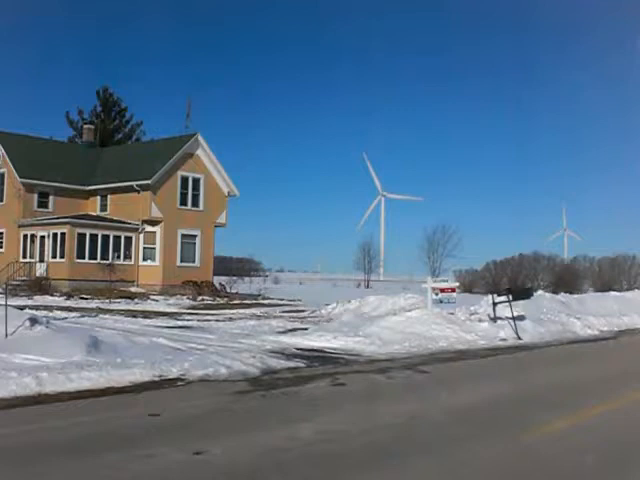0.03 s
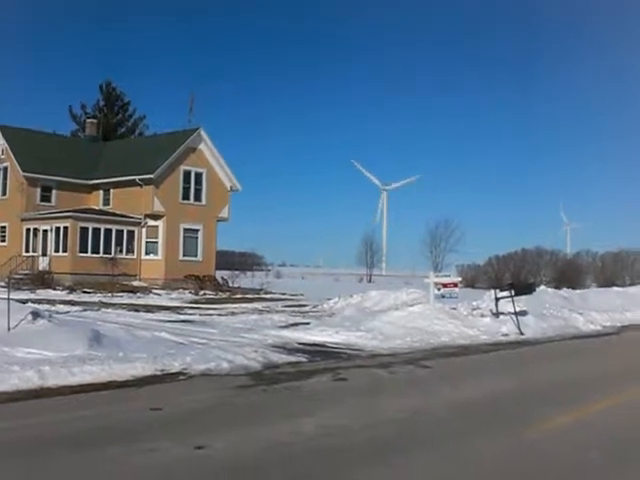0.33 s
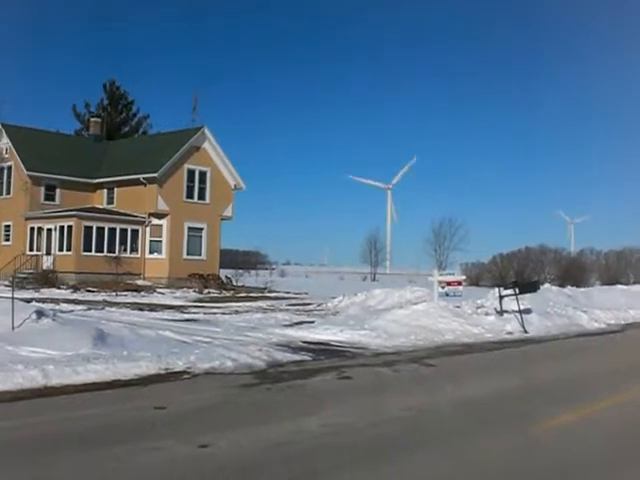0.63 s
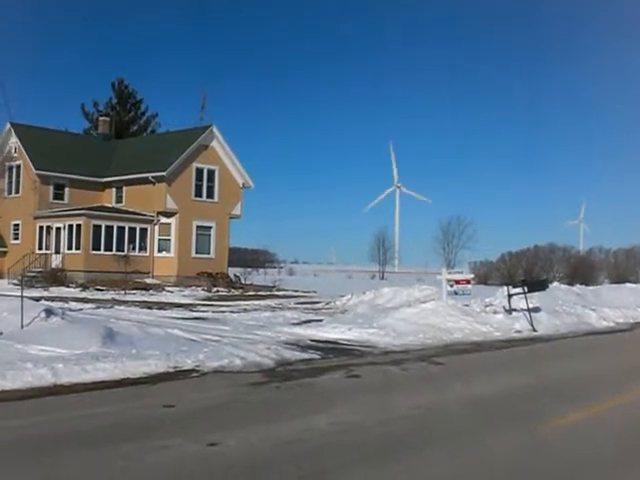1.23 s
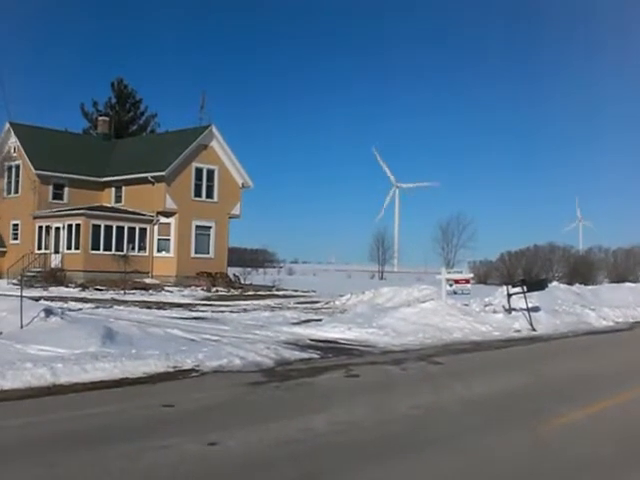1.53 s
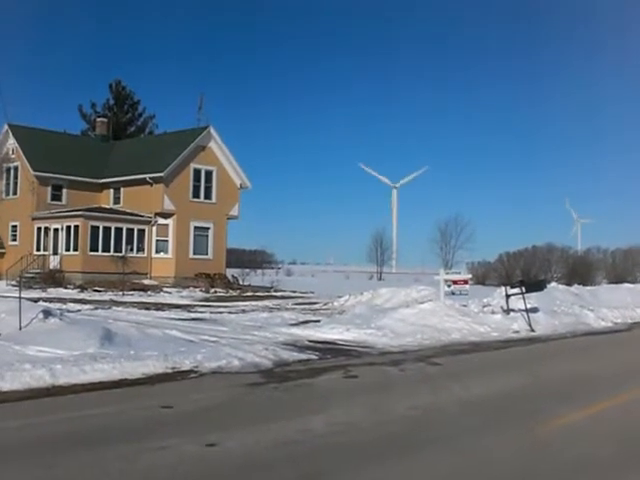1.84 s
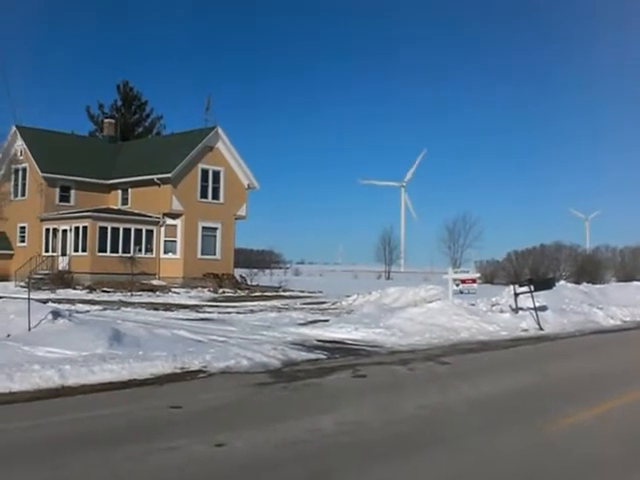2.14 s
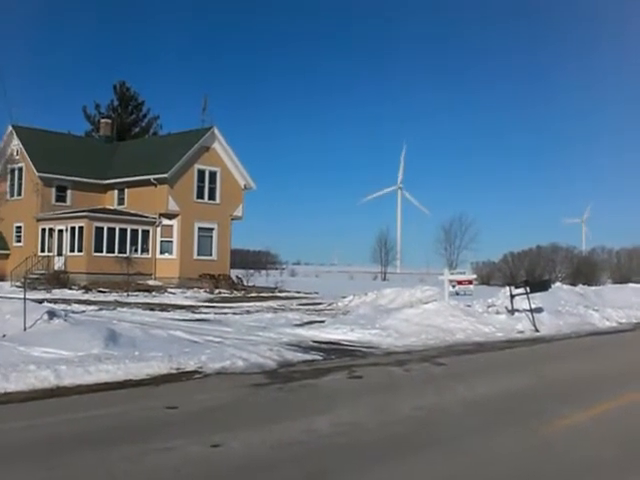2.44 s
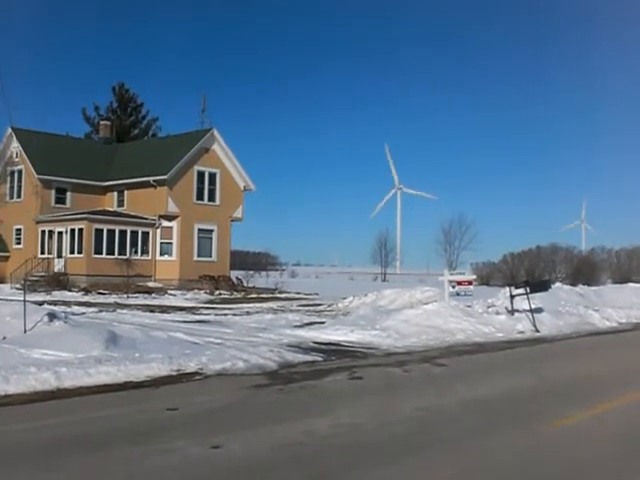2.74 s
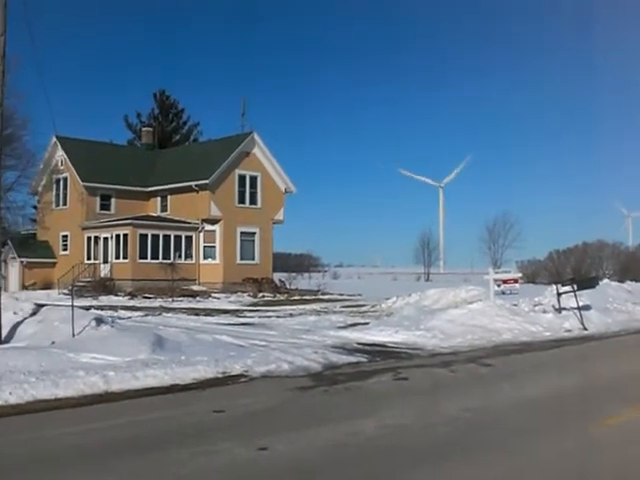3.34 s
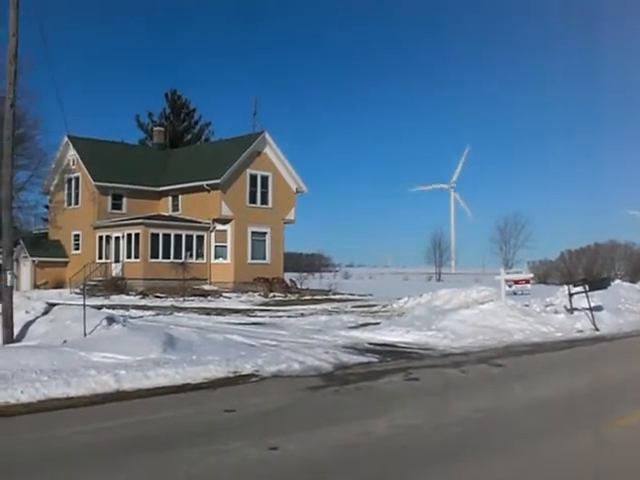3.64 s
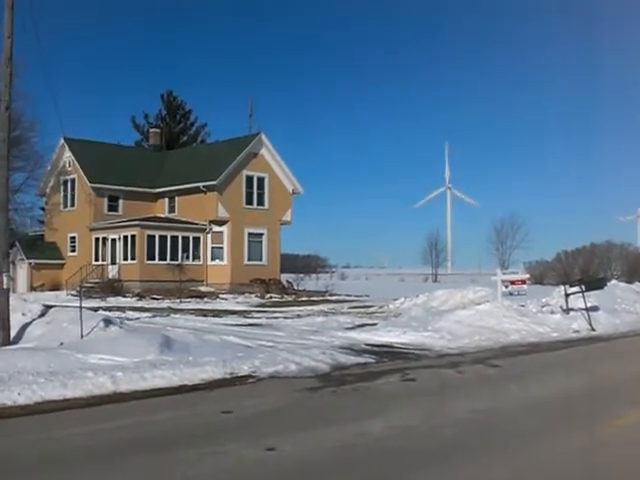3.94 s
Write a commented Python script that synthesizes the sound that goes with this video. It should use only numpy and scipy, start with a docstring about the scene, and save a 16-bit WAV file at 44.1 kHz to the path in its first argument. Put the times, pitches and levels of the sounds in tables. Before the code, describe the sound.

A nearby idling car engine hums and throbs while a light gust rumbles past.

```python
"""An engine, probably a parked car, idling close by at a roadside in open, snowy country.
Crank harmonics give a throbbing low hum; rush and hiss pulse with the firing.
Over them: a fan tone, faint whines and squeaks, and a thin whistle that comes and goes.
A few small high ticks follow the abrupt start; midway a light gust buffets the microphone."""
import sys
import numpy as np
from scipy import signal
from scipy.fft import rfft, irfft
from scipy.io import wavfile

SR = 44100
rng = np.random.default_rng(int(sys.argv[2]) if len(sys.argv) > 2 else 0)


def wav_record(signal):
    """Record a signal, one row per channel, as 16-bit PCM in the file named by sys.argv[1]."""
    frames = np.transpose(np.atleast_2d(signal))
    bounded = np.clip(frames, -1, 1)
    # unit amplitude maps onto the largest positive 16-bit level
    quanta = np.round(bounded * 32767).astype(np.int16)
    wavfile.write(sys.argv[1], SR, quanta)


N = 176400
TIME = np.arange(N) / SR
FREQS = np.maximum(np.arange(N // 2 + 1) * SR / N, 1)


def from_db(db):
    """Decibels to gain."""
    return 10 ** (np.asarray(db) / 20)


def unit_rms(x):
    """Scale to unit rms."""
    return x / np.sqrt(np.mean(x ** 2) + 1e-20)


def curve(rows):
    """Per-sample curve through (t/s, value) rows."""
    return np.interp(TIME, *np.transpose(rows))


def noise(gain):
    """Unit-rms noise shaped by a gain per frequency."""
    return unit_rms(irfft(rfft(rng.standard_normal(N)) * gain, N))


def coloured_noise(spectrum):
    """Unit-rms noise shaped by (f/Hz, relative level/dB) rows."""
    hz, db = np.transpose(spectrum)
    return noise(from_db(np.interp(np.log(FREQS), np.log(hz), db)))


def band_noise(hz, width_oct):
    """Unit-rms noise in a band, Gaussian in log frequency."""
    return noise(np.exp(-.5 * (np.log2(FREQS / hz) / width_oct) ** 2))


def ringing(hz, width_hz):
    """Unit-rms noise in a narrow resonance."""
    return noise(1 / (1 + 2 * ((FREQS - hz) / width_hz) ** 2))


def drift(rate_hz):
    """Unit-rms random wander, mostly below rate_hz."""
    return noise(1 / (1 + (FREQS / rate_hz) ** 2))


def engine_hum(turns):
    """Wavering crank harmonics; the low ones align once per turn and throb."""
    # crank harmonics: order, level/dB
    orders = [(2, -65), (5, -42), (6, -47.5), (7, -52), (8, -55), (10, -63), (11, -57), (12, -61.5),
              (13, -65.5), (14, -63.5), (15, -57.5), (16, -78), (17, -75), (18, -63), (27, -70)]
    throb_at_turns, max_aligned_order = .61, 6
    out, shared_phase = 0, rng.random()
    for order, db in orders:
        waver_db = np.interp(order, [6, 12], [1.85, 1.5])
        phase = order * (turns - throb_at_turns) + shared_phase
        phase += rng.random() * (order > max_aligned_order)
        out += from_db(db + waver_db * drift(3.7)) * np.sin(2 * np.pi * phase)
    return np.sqrt(2) * out


def fan():
    """Steady low tone, probably the cooling fan."""
    hz, db = 54.8, -52.5
    return np.sqrt(2) * from_db(db) * np.sin(2 * np.pi * (hz * TIME + rng.random()))


def whines():
    """Unsteady narrow whines, probably of belt and fan."""
    # resonances: f/Hz, width/Hz, level/dB
    resonances = [(603.5, 6, -79), (865, 45, -70), (991, 33, -66), (1109, 44, -67.5), (1177, 25, -70.5),
                  (1267, 24, -68.5), (1496, 9.6, -76), (2054, 51, -73), (2600, 22, -72.5), (2570, 11, -82),
                  (5630, 83, -83)]
    return sum(from_db(db) * ringing(hz, width_hz) for hz, width_hz, db in resonances)


def squeaks(turns):
    """Faint uneven chirps in step with the crank, probably of belt and valves."""
    # chirps: f/Hz, width/Hz, repeats per turn, offset/turns, level/dB
    chirps = [(4153, 40, 2 / 3, 1.07, -77), (3980, 31, 2 / 3, 1.05, -78.5), (2973, 23, 2, .1, -74.5)]
    sharpness, uneven_db = 2, .5
    out = 0
    for hz, width_hz, repeats, offset, db in chirps:
        gate = np.exp(sharpness * np.cos(2 * np.pi * repeats * (turns - offset)))
        strength = from_db(uneven_db * drift(12))
        out += from_db(db) * unit_rms(gate * strength * ringing(hz, width_hz))
    return out


def engine_noise(turns):
    """Fluttering rush and hiss plus an airy band; all pulse at each firing, twice per turn."""
    # engine and air rush spectrum: f/Hz, relative level/dB
    rush_spectrum = [(25, -41), (43, -28), (58, -4), (100, -8.5), (140, -3.5), (190, -5), (240, -1.5),
                     (300, -7.5), (400, -8), (520, -11.5), (800, -13), (1200, -19.5), (1400, -29.5),
                     (2000, -30.5), (4000, -59)]
    # engine hiss spectrum: f/Hz, relative level/dB
    hiss_spectrum = [(700, -18.5), (1400, -3), (1800, -6), (2100, -4), (2600, -1.6), (3200, -4.5),
                     (4000, -8.5), (5000, -12), (6300, -14.5), (8500, -17.5), (12000, -20)]
    # airy band, weaker midway: t/s, level/dB
    airy_levels = [(.3, -66.5), (.85, -65.5), (1.3, -74), (3.5, -70.5), (3.95, -62)]
    rush_db, rush_flutter_db, rush_throb = -49, 1.0, .13
    hiss_db, hiss_flutter_db, hiss_throb = -57, .64, .092
    firing = np.cos(2 * np.pi * 2 * (turns - .08))
    rush = from_db(rush_db + rush_flutter_db * drift(14)) * coloured_noise(rush_spectrum)
    hiss = from_db(hiss_db + hiss_flutter_db * drift(14)) * coloured_noise(hiss_spectrum)
    airy = from_db(curve(airy_levels)) * ringing(hz=2450, width_hz=260)
    return (1 + rush_throb * firing) * rush + (1 + hiss_throb * firing) * (hiss + airy)


def ticks():
    """Brief high ticks and rubs, perhaps of a hand near the microphone."""
    # noise puffs: t/s, length/s, f/Hz, width/octaves, level/dB (rms over the length)
    puffs = [(0.247, 0.0083, 8500, 0.25, -62.5), (0.32, .03, 8350, .07, -63),
             (0.327, 0.061, 8260, 0.32, -65), (0.534, 0.006, 9500, 0.1, -50.5),
             (0.533, 0.0072, 7000, 0.81, -52.5), (0.535, 0.0057, 3820, 0.22, -56),
             (0.577, 0.015, 4180, 0.021, -59.5)]
    out = 0
    for at_s, length_s, hz, width_oct, db in puffs:
        puff = band_noise(hz, width_oct) * np.exp(-2 * ((TIME - at_s) / length_s) ** 2)
        out += from_db(db) * unit_rms(puff) * np.sqrt(length_s * SR / N)
    return out


def whistle():
    """Thin, slightly wandering tone that comes and goes."""
    # whistle envelope: t/s, level/dB
    levels = [(.7, -90), (1.05, -72), (1.3, -83), (1.75, -75), (3.4, -72), (3.55, -84)]
    pitch_hz = 3754 + 3.01 * drift(8.2)
    return np.sqrt(2) * from_db(curve(levels)) * np.sin(2 * np.pi * np.cumsum(pitch_hz) / SR)


def wind():
    """Lumpy gust rumble plus eddy thumps; the microphone drops the deepest bass."""
    # gust envelope: t/s, level/dB
    gust = [(.3, -70), (1.0, -51), (1.35, -42), (1.58, -49), (1.75, -48), (1.95, -48), (2.3, -47.5),
            (2.6, -44), (3.0, -49), (3.3, -58), (4.0, -52)]
    # rumble spectrum: f/Hz, relative level/dB
    rumble_spectrum = [(30, -38), (43, -29), (58, 1), (120, -4.5), (180, -9), (260, -13.5), (400, -23.5),
                       (800, -48)]
    lump_db, low_cut_hz = 1.5, 48
    rumble = from_db(curve(gust) + lump_db * drift(51)) * coloured_noise(rumble_spectrum)
    low_cut = signal.butter(4, low_cut_hz, "high", fs=SR, output="sos")
    return signal.sosfiltfilt(low_cut, rumble + buffets())


def buffets():
    """Eddies hit the microphone: a brighter front edge, then a pressure swing that wobbles and slows."""
    # eddies: t/s, length/s, f/Hz, level/dB
    eddies = [(1.141, 0.0088, 108, -33.5), (1.314, 0.014, 93, -32), (1.337, 0.0086, 179, -33),
              (1.359, 0.011, 174.2, -25), (1.422, .009, 121.5, -32.5), (1.45, 0.018, 74, -31.5),
              (1.473, 0.014, 190, -37), (1.647, 0.024, 101.2, -36.5), (1.697, 0.015, 72.5, -30.5),
              (1.72, 0.011, 119.4, -29), (1.768, 0.011, 151, -34), (1.796, 0.021, 138, -28.5),
              (1.896, 0.007, 160, -40.5), (2.013, 0.015, 100.2, -34.5), (2.073, 0.02, 165.7, -38),
              (2.181, .018, 78, -34), (2.247, 0.0065, 159, -34), (2.276, 0.02, 69, -31.5),
              (2.292, 0.0064, 190, -35.5), (2.303, 0.0057, 175, -31.5), (2.352, 0.033, 136, -34),
              (2.439, 0.0073, 156, -33.5), (2.461, 0.0072, 205, -27.5), (2.48, 0.011, 121, -28.5),
              (2.589, 0.0058, 140.4, -36), (2.723, 0.0078, 163.1, -30), (2.748, .015, 83, -25.5),
              (2.911, 0.014, 78, -34), (2.987, 0.011, 97, -34), (3.03, .01, 126, -41),
              (3.078, 0.017, 101.4, -25.5)]
    sag_oct_per_length, edge_lead_s = .15, .0033
    wander_oct = .2 * drift(71.8)
    edge_noise = from_db(-12) * band_noise(hz=238, width_oct=.43)
    out = np.zeros(N)
    for at_s, length_s, hz, db in eddies:
        near = abs(TIME - at_s) < 3 * length_s
        age = (TIME[near] - at_s) / length_s
        pitch_hz = hz * 2 ** (wander_oct[near] - sag_oct_per_length * age)
        phase = np.cumsum(pitch_hz) / SR + rng.random()
        swing = np.sqrt(2) * np.sin(2 * np.pi * phase) * np.exp(-2 * age ** 2)
        edge = edge_noise[near] * np.exp(-8 * (age + edge_lead_s / length_s) ** 2)
        out[near] += from_db(db) * (swing + edge)
    return out


def scene():
    """Engine, ticks and wind at one microphone."""
    # idle speed: t/s, crank rate/Hz
    speed = [(.3, 14.8), (.9, 14.81), (1.2, 14.91), (1.7, 14.92), (1.87, 15.08), (2.15, 14.85),
             (2.45, 14.82), (2.8, 14.91), (3.45, 14.88), (3.75, 15.04), (4.0, 14.94)]
    turns = np.cumsum(curve(speed)) / SR
    engine = engine_hum(turns) + fan() + whines() + squeaks(turns) + engine_noise(turns)
    return (engine + ticks() + whistle() + wind())[None]


def record(dry):
    """Narrow treble dip, abrupt start after silence, steep low-pass."""
    notch_hz, notch_width_hz, notch_depth = 7900, 85, .76
    start_s, fade_s, cutoff_hz = .244, .002, 12040
    notch = 1 - notch_depth * np.exp(-((FREQS - notch_hz) / notch_width_hz) ** 2)
    fade_in = np.clip((TIME - start_s) / fade_s, 0, 1)
    low_pass = signal.ellip(14, .1, 80, cutoff_hz, fs=SR, output="sos")
    return signal.sosfilt(low_pass, irfft(rfft(dry) * notch, N) * fade_in)


dry = scene()
out = record(dry)
wav_record(out)
```